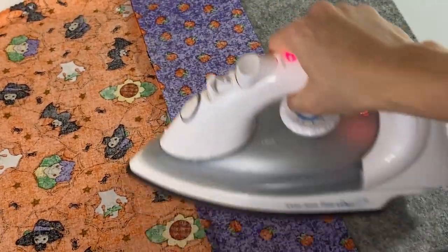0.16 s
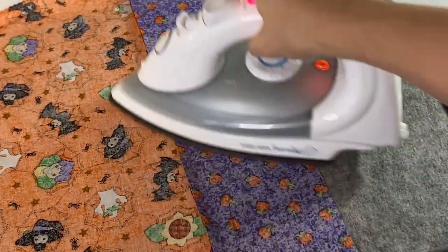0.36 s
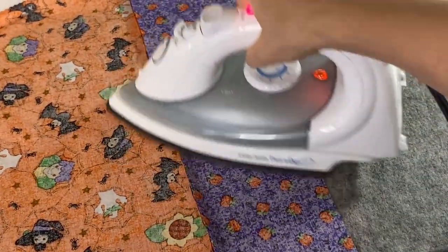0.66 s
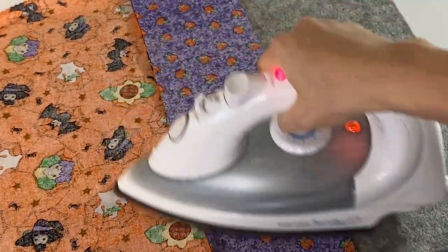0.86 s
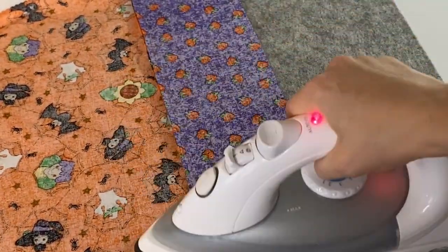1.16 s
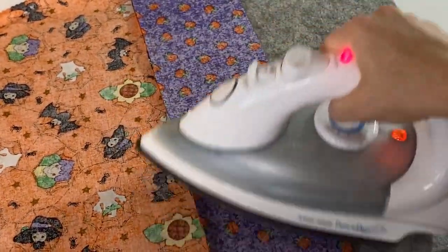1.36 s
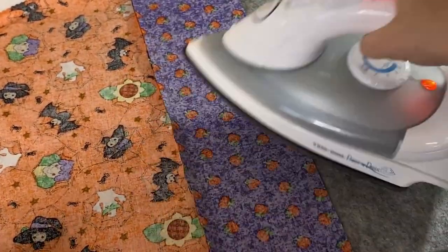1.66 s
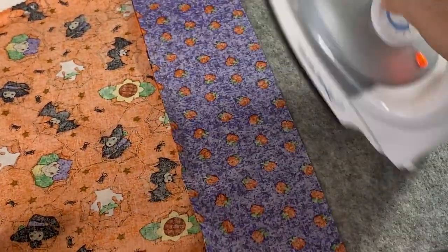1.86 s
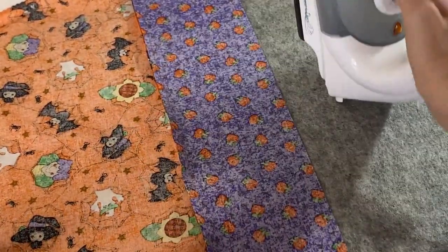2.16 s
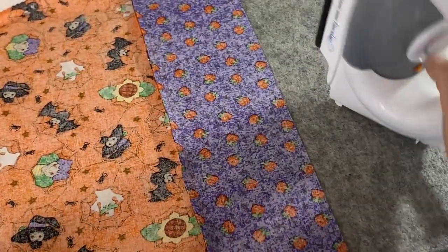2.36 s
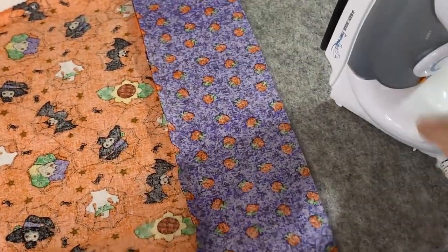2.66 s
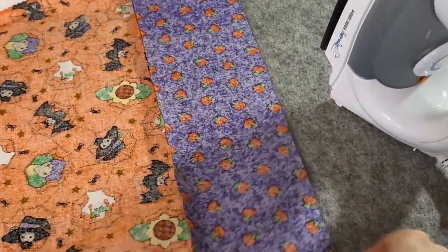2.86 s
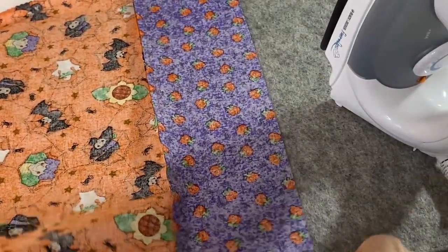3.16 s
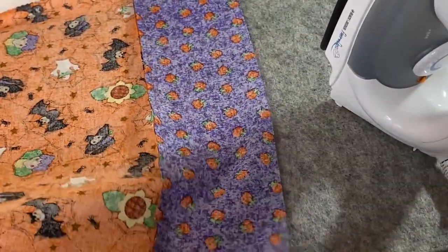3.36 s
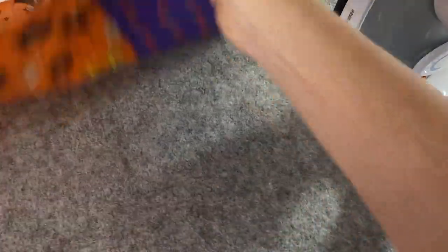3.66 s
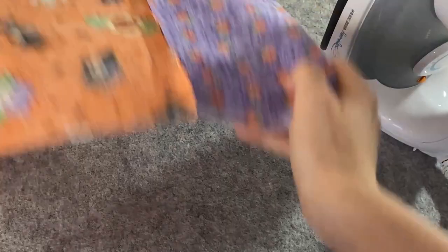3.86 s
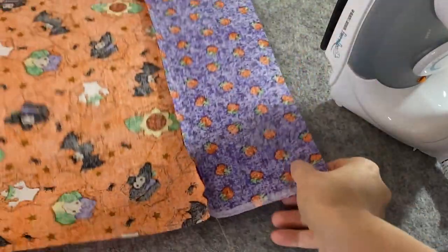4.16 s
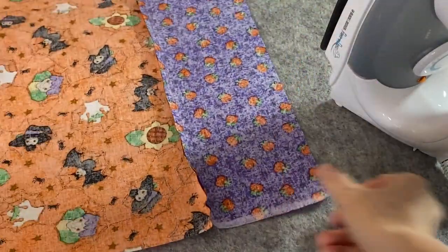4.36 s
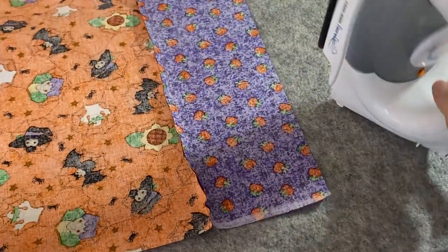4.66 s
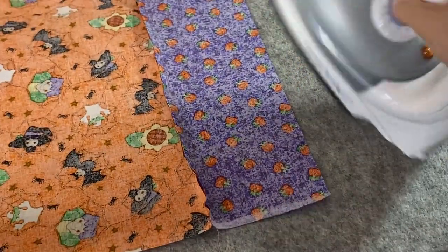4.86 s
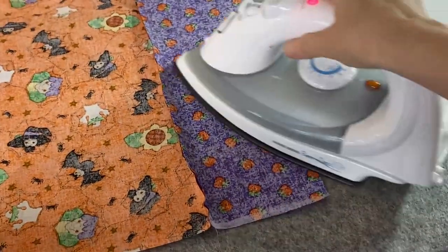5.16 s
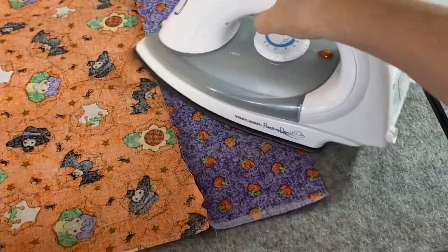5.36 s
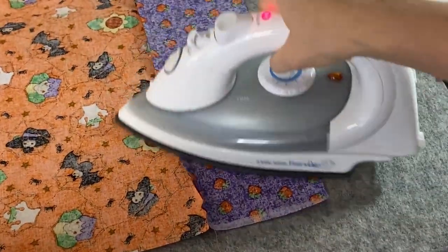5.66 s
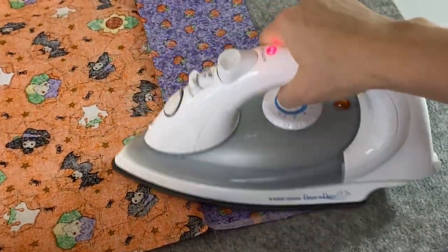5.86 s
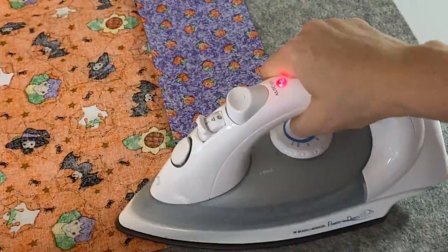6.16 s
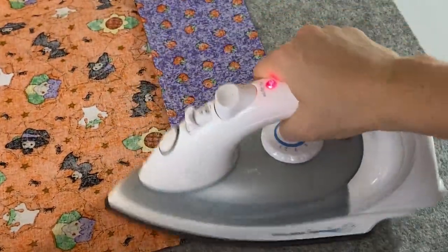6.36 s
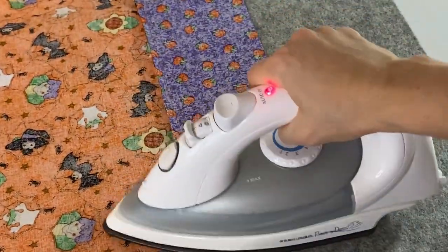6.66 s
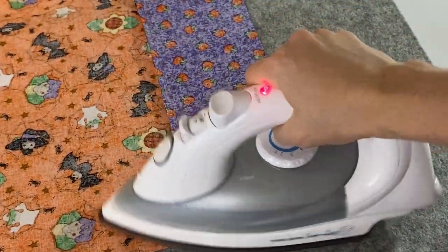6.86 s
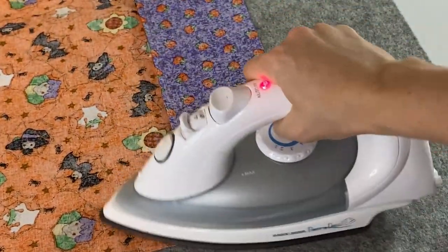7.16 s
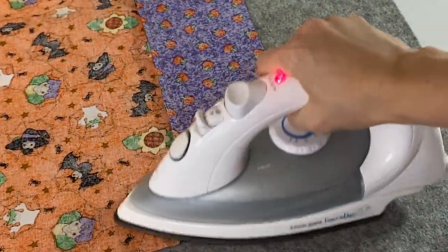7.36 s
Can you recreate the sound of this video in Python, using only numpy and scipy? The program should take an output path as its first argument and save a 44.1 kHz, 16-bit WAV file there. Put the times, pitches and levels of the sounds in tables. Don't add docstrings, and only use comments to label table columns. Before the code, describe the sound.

Close, quiet indoor ironing: soft sliding hisses, plastic ticks and hollow knocks, fabric brushing, and low thumps through a felt-covered table.

```python
import sys
import numpy as np
from scipy import signal
from scipy.fft import rfft, irfft, next_fast_len
from scipy.io import wavfile

SR = 44100
rng = np.random.default_rng(int(sys.argv[2]) if len(sys.argv) > 2 else 0)


def unload_wav(signal):
    wavfile.write(
        sys.argv[1],
        SR,
        np.round(np.clip(np.atleast_2d(signal).T, -1, 1) * 32767).astype(np.int16),
    )


def amplitude_ratio(level_db):
    exponent = np.asarray(level_db, float) / 20
    return 10 ** exponent


N = 331146


def at_hz(points, hz):
    f, value = np.transpose(points)
    return np.interp(np.log(hz + 1), np.log(f + 1), value)


def band(x, low_hz, high_hz):
    edges_hz = [low_hz, min(high_hz, .45 * SR)]
    return signal.sosfilt(signal.butter(2, edges_hz, "band", fs=SR, output="sos"), x)


def add(out, s, sound):
    i = round(s * SR)
    out[i:i + len(sound)] += sound[:N - i]


def drift(rate_hz):
    r = np.exp(-80 * np.pi * rate_hz / SR)
    slow = signal.lfilter([1], [1, -2 * r, r * r], rng.standard_normal(N // 40 + 2002))[2000:]
    return np.interp(np.arange(N) / 40, np.arange(len(slow)), slow / slow.std())


def rubbing(spectrum, ref_low, ref_high, patchy_db, rate, grain_db):
    slips = rng.standard_normal((2, N)) * amplitude_ratio(grain_db * np.minimum(rng.exponential(1, N), 4))
    lowest_hz, highest_hz = spectrum[0][0], spectrum[-1][0]
    edges = lowest_hz * 2 ** np.arange(0, np.log2(highest_hz / lowest_hz) + .2, 1 / 3)
    out, together = 0, drift(rate)
    for k, (low, high) in enumerate(zip(edges, edges[1:])):
        flicker_db = patchy_db * (together + drift(rate))
        gain = amplitude_ratio(at_hz(spectrum, np.sqrt(low * high)) + flicker_db)
        out = out + gain * band(slips[k % 2], low, high)
    return out / band(out, ref_low, ref_high).std()


def pile(quiet_db, parts):
    power = amplitude_ratio(2 * quiet_db) + sum((amplitude_ratio(db) * shape) ** 2 for db, shape in parts)
    return np.interp(np.arange(N) / SR * 1000, np.arange(len(power)), np.sqrt(power))


def speed(t, s, length):
    speed_up_s, slow_down_s = 0.049, 0.051
    gathering = 1 - np.exp(-np.maximum(t - s, 0) / speed_up_s)
    slowing = 1 - np.exp(-np.maximum(s + length - t, 0) / slow_down_s)
    return gathering * slowing


# start t/s, length/s, hiss level/dB, sheen level/dB
SOLE_STROKES = [(-.2, 0.72, -63.5, -74.5), (.555, 0.56, -62.5, -73.5), (1.17, 0.088, -69, -75),
                (1.28, 0.2, -68, -80), (1.42, 0.28, -62.5, -89.5), (1.66, 0.3, -65, -81),
                (5.08, 0.4, -65.5, -75), (5.48, 0.68, -64.5, -75), (6.15, 0.18, -61, -71),
                (6.32, .14, -61, -68), (6.46, .13, -64.5, -69), (6.59, .11, -62, -68.5),
                (6.7, .13, -63.5, -69.5), (6.83, 0.1, -62.5, -68), (6.93, 0.26, -64, -73),
                (7.16, 0.12, -63.5, -71), (7.26, 0.49, -63.5, -73.5)]
BRUSH_STROKES = [(.47, .12, -78, -88), (1.22, 0.097, -83, -84), (3.07, 0.054, -57, -60),
                 (3.33, 0.081, -62.5, -74), (1.95, 0.25, -70.5, -82.5), (2.19, 0.17, -62, -79.5),
                 (2.36, 0.18, -65.5, -81.5), (2.48, 0.37, -72, -84), (2.8, 0.26, -63, -75.5),
                 (3.04, 0.36, -65, -79), (3.39, .28, -61, -74), (3.62, 0.27, -67.5, -81.5),
                 (3.85, 0.23, -76, -87.5), (3.99, 0.23, -67.5, -75.5), (4.235, 0.12, -68.5, -78.5),
                 (4.65, 0.17, -60.5, -76), (4.8, 0.6, -67.5, -92)]
# t/s, hiss level/dB, drag level/dB
LOOSE_SCUFFS = [(-.012, -53, -47.5), (.62, -82, -58), (1.071, -56, -58), (1.353, -57.5, -53.5),
                (1.83, -63, -54), (1.955, -64, -61.5), (2.19, -67, -56), (2.268, -69, -59.5),
                (2.764, -65, -62), (3.084, -63, -74), (3.23, -79, -58), (3.589, -65.5, -64),
                (3.817, -65, -61), (4.711, -58.5, -48.5), (4.849, -74, -55.5), (5.062, -49, -49),
                (5.483, -56.5, -56), (6.33, -78, -58.5), (6.509, -56.5, -60), (6.72, -61, -64),
                (6.99, -80, -66), (7.41, -79, -61)]
# f/Hz, density/dB per Hz
WEAVE_HISS = [(1200, 1), (1900, 0), (2800, 3), (3400, 1.5), (4500, -6.5), (6500, -8.5), (8000, -5)]
FINE_SHEEN = [(4000, 4), (5500, 3), (7500, -1.5), (9200, 2.5), (11000, -4.5), (12500, 14), (14000, -0.5),
              (15500, -15.5)]
MAT_DRAG = [(350, 2.5), (600, 2), (850, -5), (1200, -10), (1700, -20)]


def glide():
    t = np.arange(0, N / SR, .001)
    linger_s = 0.016
    rise_s, fade_s = 0.017, 0.042
    hiss_parts, sheen_parts, drag_parts = [], [], []
    for s, length, hiss_db, sheen_db in list(SOLE_STROKES) + list(BRUSH_STROKES):
        sole = speed(t, s, length)
        cloth = speed(t, s - linger_s, length + 2 * linger_s)
        hiss_parts.append((hiss_db, cloth ** 0.85))
        sheen_parts.append((sheen_db, sole ** 0.98))
        drag_parts.append((hiss_db - 0.5, cloth ** 0.8))
    for s, hiss_db, drag_db in LOOSE_SCUFFS:
        age = np.maximum(t - s, 0)
        scuff = (1 - np.exp(-age / rise_s)) * np.exp(-age / fade_s) * 2
        hiss_parts.append((hiss_db, scuff))
        drag_parts.append((drag_db, scuff))
    hiss = pile(-84, hiss_parts) * amplitude_ratio(-5.5)
    sheen = pile(-94.5, sheen_parts)
    drag = pile(-75, drag_parts) * amplitude_ratio(-4.0)
    return (hiss * rubbing(WEAVE_HISS, 1320, 7700, patchy_db=1.5, rate=12.8, grain_db=-1.0)
            + sheen * rubbing(FINE_SHEEN, 10520, 12900, patchy_db=1.0, rate=38.0, grain_db=3.0)
            + drag * rubbing(MAT_DRAG, 376, 1900, patchy_db=1.5, rate=90.0, grain_db=2.0))


# start t/s, time to peak/s, rumble level/dB, board level/dB
WEIGHT_SHIFTS = [(-.04, 0.045, -51, -61), (0.638, 0.085, -83, -61), (.8, 0.34, -88, -72.5),
                 (1.34, 0.068, -69, -58), (1.0, 0.44, -72, -72), (2.2, 0.077, -76, -62.5),
                 (2.4, 0.11, -62.5, -59), (2.831, 0.034, -74, -54), (3.12, 0.2, -68, -69),
                 (3.6, 0.059, -50, -64), (3.88, 0.038, -49.5, -81), (4.48, 0.077, -59, -93),
                 (4.8, 0.092, -67, -62), (5.06, 0.079, -56, -55), (5.3, 0.097, -71, -63),
                 (6.499, 0.026, -66, -52), (6.75, 0.035, -54, -59), (7.0, 0.065, -58, -60)]
# f/Hz, density/dB per Hz
FRAME_RUMBLE = [(28, -13), (45, -11.5), (70, -6.5), (115, -17)]
TOP_BOARD = [(100, 1.5), (160, 5), (250, 1), (420, -6.5)]


def table():
    t = np.arange(0, N / SR, .001)
    rumble_parts, board_parts = [], []
    for s, rise_s, rumble_db, board_db in WEIGHT_SHIFTS:
        age = np.maximum(t - s, 0) / rise_s
        swell = age * np.exp(1 - age)
        rumble_parts.append((rumble_db, swell))
        board_parts.append((board_db, swell))
    rumble = pile(-67.5, rumble_parts) * amplitude_ratio(-1.0)
    board = pile(-66.5, board_parts) * amplitude_ratio(2.5)
    return (rumble * rubbing(FRAME_RUMBLE, 35, 63, patchy_db=1.0, rate=12.0, grain_db=1.0)
            + board * rubbing(TOP_BOARD, 95, 430, patchy_db=2.52, rate=7.4, grain_db=2.0))


# t/s, peak level/dB, crisp part/dB, bright part/dB, dull part/dB
SOFT_SNAPS = [(0.046, -44, -5, -15, -8), (1.111, -46.5, -20, -41, 4), (1.3547, -44, -11, -23, 0),
              (1.838, -44.5, -13, -21, 10), (1.8861, -47, -21, -35, -18), (2.2092, -49.5, -10, -13.5, -16),
              (2.284, -48, -1.5, -9, -9), (2.7597, -40, -14, -16, 2), (3.819, -52.5, -5.5, -15, -13),
              (4.6312, -46, -5.5, -11, 4), (5.3517, -52.5, -23, -19, 11.5), (5.9435, -41.5, -17, -39, 5.5),
              (6.1634, -40.5, -12, -17, 0.5), (6.5173, -45.5, -9, -42, 7), (7.4237, -41, -26, -32, 5)]
SHARP_TICKS = [(0.5557, -56, -5.5, -37, -19), (0.619, -41, -4.5, -17, 4), (2.454, -48.5, -12.5, -19, -32),
               (3.23, -50.5, -4.5, -12, 12.5), (4.7207, -49, -9, -15, -1), (4.95, -71, 4, -28, 24),
               (5.014, -48, -19, -28, -14), (5.0643, -29, -13, -26, 5.5), (5.0786, -31, -6.5, -26, 0),
               (5.4908, -41.5, -9, -17, 7), (5.503, -45, -11, -23, -5), (6.337, -43, -10, -19, 5),
               (6.351, -50, -6, -6, -2), (6.3702, -48.5, -8, -8, 7), (6.731, -49, -30, -13, 9),
               (7.048, -54.5, 14, -10, 1), (7.391, -56, 1, -6, -1), (7.405, -44, -13, -25, 6)]
HOUSING_CLICKS = [(1.869, -55, -4, -2, -25), (1.5219, -55, -13, -16, -10), (2.916, -56, 3, -8, -20),
                  (3.3483, -59, -7, -15, -10), (3.4097, -74, 1, 10, -10), (4.0143, -68, -2, 4, -8),
                  (4.0325, -53, -5, -6, -10), (4.6288, -53, -15, -3, -10), (6.164, -49.5, 5.5, -2, 4),
                  (6.337, -42.5, -8, -16, -3), (6.3487, -44, -1, -12, 4), (6.37, -46, 2, -14, -3),
                  (7.0484, -46.5, 3.5, -6, -5), (7.358, -53, -3, -21, -8), (7.3887, -49.5, 4, 7, 6),
                  (7.4045, -52, 2, -8, -5), (7.4233, -55, 0, -17, -6), (7.4662, -48, -3, -10, -10)]


def ticks():
    out, t = np.zeros(N), np.arange(2600) / SR
    edges_hz = ((900, 1710), (1900, 4820), (4300, 10500), (9300, 19000))
    for rows, ms in ((SOFT_SNAPS, 5.4), (SHARP_TICKS, 3.7), (HOUSING_CLICKS, 1.5)):
        fade = np.exp(-t * 1600 / ms) + 0.026 * np.exp(-t / 0.02)
        for s, db, crisp_db, bright_db, dull_db in rows:
            snap = rng.standard_normal(len(t)) * fade
            levels_db = (dull_db - 12.0, 0, crisp_db + 5.0, bright_db + 9.5)
            parts = [band(snap, *edges) for edges in edges_hz]
            sound = sum(amplitude_ratio(db + d) * p / abs(p).max() for d, p in zip(levels_db, parts))
            add(out, s - .001, sound)
    return out


# t/s, peak level/dB, pitch f/Hz, t60/s, starting pitch ratio
FLAT_LANDING = [
    (0.047, -34.5, 184, 0.027, 0.97),
    (0.055, -34, 313, 0.047, 1),
    (0.0542, -25.5, 149, 0.14, 1.12),
    (0.0631, -23, 68.3, 0.19, 1.75),
    (0.083, -55, 170, 0.075, 1.8),
    (0.158, -52, 138, 0.029, 1.4),
    (0.161, -27.5, 66.4, 0.099, 0.67),
    (0.178, -29, 77, 0.046, 1.1),
]
# t/s, peak level/dB, pitch f/Hz, t60/s
TOP_BLOWS = [(1.358, -53, 227, 0.25), (1.83, -44, 170.6, 0.16), (2.282, -46.5, 281, 0.16),
             (2.503, -46, 262.4, 0.34), (2.853, -43, 157, 0.14), (2.865, -51, 140, 0.11),
             (2.881, -54, 164, 0.17), (3.241, -41.5, 159, 0.067), (3.621, -45, 121, .13),
             (3.671, -34, 144, 0.028), (3.713, -39.5, 124, 0.15), (3.938, -33.5, 161, 0.015),
             (3.94, -54, 265, 0.055), (1.839, -46.5, 381, .08), (2.51, -49, 397, 0.072),
             (5.077, -41.5, 192.7, 0.38), (5.109, -42, 147.4, 0.34), (5.141, -43, 206, 0.13),
             (6.515, -50, 183, 0.15), (6.752, -44, 150, 0.15), (6.784, -44.5, 134.6, 0.26),
             (6.996, -39.5, 134.7, 0.4), (7.029, -36.5, 145, 0.066), (7.244, -38, 142.5, 0.23),
             (7.276, -39.5, 137, 0.29), (7.28, -46, 203, 0.28), (7.001, -53.5, 214, .15),
             (6.76, -57, 210, 0.17), (2.861, -46.5, 260, 0.13), (7.24, -54, 332, 0.074),
             (.66, -54, 398, .1), (1.419, -51, 335, 0.082), (5.071, -49, 296, 0.15), (.06, -57, 390, .06),
             (1.27, -48, 153, 0.13), (6.3, -61, 238, .15)]
FRAME_THUMPS = [(0.244, -44, 53.6, 0.17, 1.1), (2.272, -52, 88, 0.25, 1.9), (2.458, -47, 48, 0.15, 1),
                (3.146, -35.5, 52, 0.18, 1.03), (3.454, -35.5, 57.6, 0.11, 1.6),
                (3.498, -38, 73, 0.088, 1.3), (3.562, -38.5, 58, 0.11, 1), (3.634, -35.5, 107, 0.085, 1.26),
                (3.672, -34, 70.4, 0.17, 0.94), (3.714, -36.5, 70.6, 0.12, 0.63),
                (3.855, -41, 75, 0.15, 1.52), (3.878, -37.5, 66, 0.07, 0.92),
                (3.95, -27.5, 72, 0.089, 1.07), (4.01, -46, 61, 0.091, 1.2), (4.513, -44.5, 49, 0.28, 1.9),
                (4.558, -48, 47.7, 0.064, 1.3), (5.066, -40, 94, 0.098, 1.26), (5.08, -34, 55, 0.056, 0.89)]


def thumps():
    out, t = np.zeros(N), np.arange(12000) / SR
    blows = [(*row, 1.08) for row in TOP_BLOWS]
    for s, db, hz, t60, ratio in list(FLAT_LANDING) + blows + list(FRAME_THUMPS):
        cycles = np.cumsum(hz * (1 + (ratio - 1) * np.exp(-t / 0.014))) / SR
        shape = (1 - np.exp(-(t * hz / 0.62) ** 2)) * amplitude_ratio(-60 * t / t60)
        puff = band(rng.standard_normal(len(t)), 1.79 * hz, 2.7 * hz)
        sound = amplitude_ratio(-19) * puff / puff.std() - np.sin(2 * np.pi * cycles)
        add(out, s - 0.391 / hz, amplitude_ratio(db - 1.0) * sound * shape / shape.max())
    return out


# t/s, peak level/dB, pitch f/Hz, t60/s
BODY_KNOCKS = [(1.109, -53, 523, 0.1), (1.361, -63, 523, 0.073), (1.836, -38.5, 690, 0.031),
               (1.8865, -29.5, 670, 0.017), (2.033, -44.5, 830, 0.017), (2.19, -53, 768, 0.056),
               (2.288, -50.5, 770, 0.079), (2.455, -38, 730, 0.018), (2.759, -51.5, 565, 0.11),
               (3.232, -51, 533, 0.096), (3.612, -45, 505, 0.032), (4.722, -40.5, 765, 0.039),
               (4.735, -42, 802, 0.041), (4.743, -34.5, 827, 0.034), (4.79, -43, 710, 0.019),
               (5.0635, -31, 700, 0.018), (5.07, -44, 700, 0.016), (4.95, -48, 900, 0.018),
               (5.352, -48, 515, 0.046), (6.526, -44, 1010, 0.017), (6.35, -48.5, 840, 0.035),
               (7.423, -46, 884, 0.049)]


def knocks():
    out, t = np.zeros(N), np.arange(6000) / SR
    for s, db, hz, t60 in BODY_KNOCKS:
        sound = np.zeros(len(t))
        for gain, ratio in ((1, 1), (.45, .72), (.35, 1.38)):
            sound += gain * np.sin(2 * np.pi * (ratio * hz * t + rng.random()))
        rattle = band(rng.standard_normal(len(t)), 0.53 * hz, 1.4 * hz)
        sound += 1.04 * rattle * amplitude_ratio(25 * t / t60)
        shape = (1 - np.exp(-t / 0.0007)) * amplitude_ratio(-60 * t / t60)
        add(out, s - .001, amplitude_ratio(db - 1.5) * sound * shape)
    return out


# t/s, level/dB, centre f/Hz, fade/s
SHELL_BUZZES = [
    (1.355, -67, 3040, .03),
    (1.885, -59.5, 2530, 0.014),
    (1.97, -63.5, 3030, 0.044),
    (2.454, -60, 3020, 0.013),
    (2.762, -61, 2820, 0.055),
    (4.85, -66, 2830, 0.023),
    (5.503, -66, 2930, 0.062),
    (6.351, -77, 3000, 0.014),
    (7.422, -58, 3800, .012),
]


def buzzes():
    out, t = np.zeros(N), np.arange(9000) / SR
    width = 1.17
    for s, db, hz, fade_s in SHELL_BUZZES:
        buzz = band(rng.standard_normal(len(t)), hz / width, hz * width)
        shape = (1 - np.exp(-t / 0.0016)) * np.exp(-t / fade_s)
        add(out, s, amplitude_ratio(db) * buzz / buzz.std() * shape)
    return out


# t/s, peak level/dB, free ring/ms, ring left after contact/dB,
# fall-off from the favoured pitch/dB per octave
SHELL_CLACKS = [
    (1.9488, -30.5, 16.0, -18, .5),
    (4.846, -39, 7.0, -32, 12),
]
# f/Hz, level/dB, t60/s
SHELL_MODES = [(960, -7, .09), (2730, -4, .25), (3005, -1, .25), (1330, -14, .06), (3345, 1, .14),
               (3620, -5, .08), (4300, -14, .1), (5570, -8, .13), (7700, -15, .08), (10800, -19, .1),
               (13400, -15, .2), (14200, -16, .06)]


def clacks():
    out, t = np.zeros(N), np.arange(11000) / SR
    hz, mode_db, t60 = np.transpose(SHELL_MODES)[:, :, None]
    favoured_hz = 2950
    for s, db, ring_ms, left_db, fall_db in SHELL_CLACKS:
        turn, noise = rng.random((len(hz), 1)), rng.standard_normal(len(t))
        level_db = mode_db - fall_db * abs(np.log2(hz / favoured_hz)) - 60 * t / t60
        ring = (amplitude_ratio(level_db) * np.sin(2 * np.pi * (hz * t + turn))).sum(axis=0)
        rough = 1 + 3.7 * band(noise, 44, 360)
        scrape = 0.11 * band(noise, 1300, 11200) * np.exp(-t * 1500 / ring_ms)
        push = 1 - np.exp(-(t / .004) ** 2)
        damping = amplitude_ratio(left_db / (1 + np.exp(-(t * 1000 - ring_ms) / 2.5)))
        sound = (ring * rough + scrape) * push * damping
        add(out, s, amplitude_ratio(db) * sound / abs(sound).max())
    return out


# f/Hz, phase/radians
PHASE_GAP = [(4000, 0), (6300, -.8), (7500, 2.0), (8250, 2.3), (8600, 3.1), (9500, 3.2), (11900, 6.2),
             (15000, 9.1)]
# f/Hz, level/dB
LEFT_OVER_RIGHT = [(100, -0.7), (250, -3.3), (550, -6), (1000, 0), (2200, 1.4), (4500, 2.4)]
# f/Hz, level/dB
UNSHARED = [(50, -23), (130, -12), (300, -11), (900, -6), (2400, -15), (4000, -17), (6000, -11),
            (14000, -9)]


def ports(x):
    size = next_fast_len(N + 8192)
    hz = np.arange(size // 2 + 1) * SR / size
    scatter = rng.standard_normal(6000) * np.exp(-np.arange(6000) / 1300)
    scatter = np.exp(1j * np.angle(rfft(scatter, size))) * amplitude_ratio(at_hz(UNSHARED, hz))
    left = np.exp(.5j * at_hz(PHASE_GAP, hz)) * amplitude_ratio(at_hz(LEFT_OVER_RIGHT, hz) / 2)
    paths = np.array([left + scatter, 1 / left - scatter])
    return irfft(rfft(x, size) * paths, size)[:, :N]


def room(x):
    t60_s, level_db = 0.26, -15
    t = np.arange(round(.4 * SR)) / SR
    tail = band(rng.standard_normal((2, len(t))), 220, 2700) * amplitude_ratio(-60 * t / t60_s) * (t > .004)
    tail /= np.sqrt((tail ** 2).sum(axis=1)[:, None])
    return amplitude_ratio(level_db) * signal.fftconvolve(x[None], tail, axes=1)[:, :N]


def scene():
    hard = ticks() + knocks() + buzzes()
    return ports(glide() + table() + thumps() + clacks() + hard) + room(hard)


def low_pass(x):
    return signal.sosfilt(signal.butter(12, 15750, fs=SR, output="sos"), x)


def record(dry):
    mix = signal.sosfilt(signal.butter(3, 33, "high", fs=SR, output="sos"), dry)
    return low_pass(mix)


dry = scene()
out = record(dry)
unload_wav(out)
```